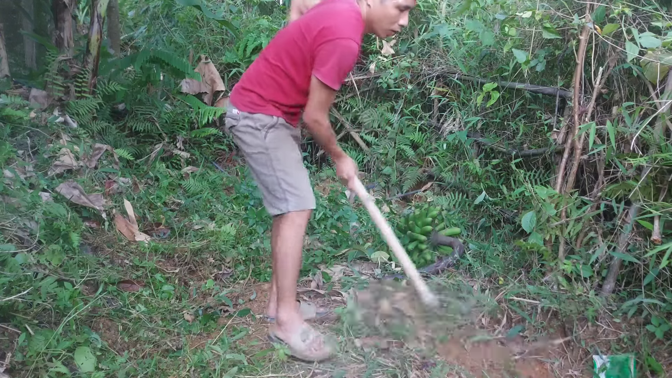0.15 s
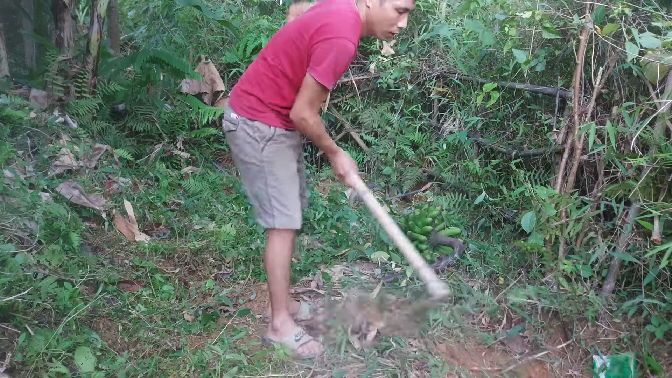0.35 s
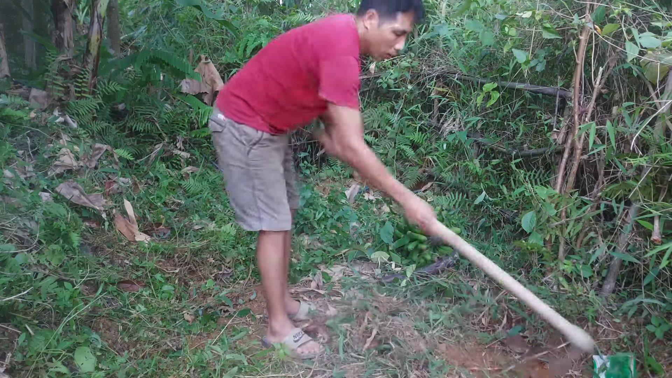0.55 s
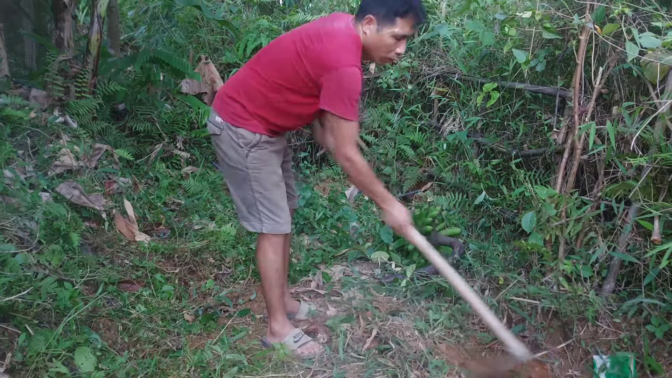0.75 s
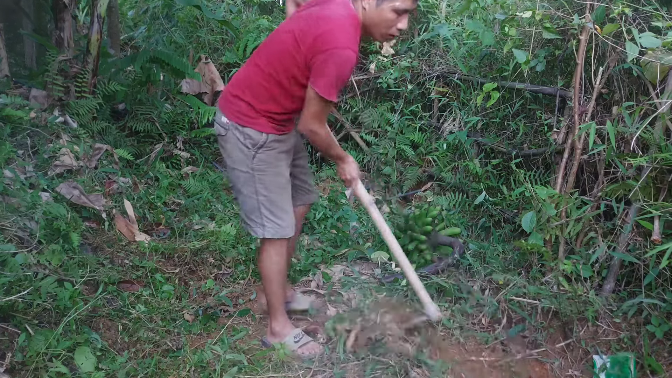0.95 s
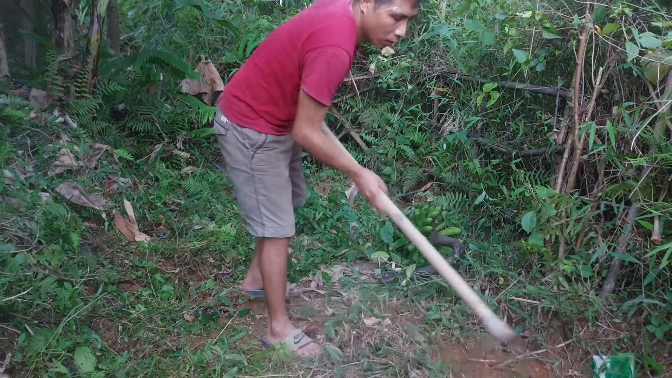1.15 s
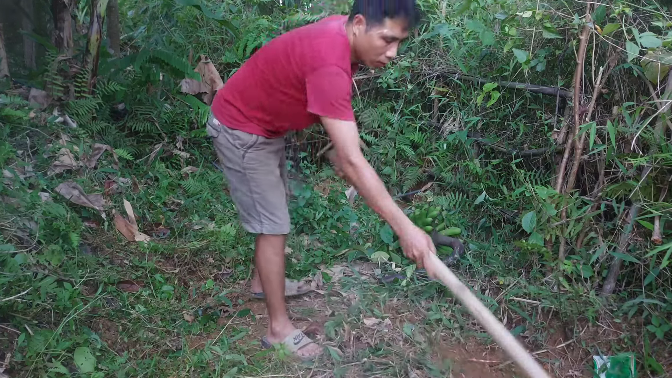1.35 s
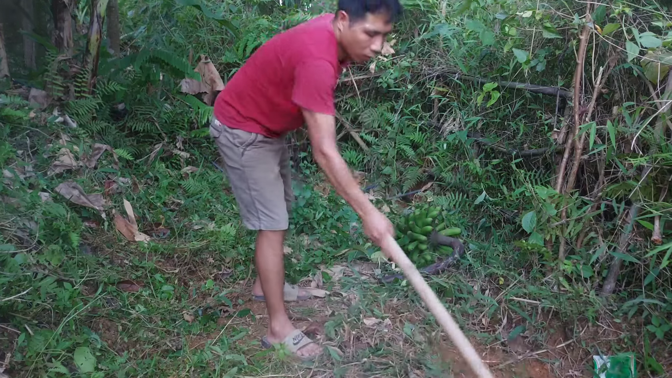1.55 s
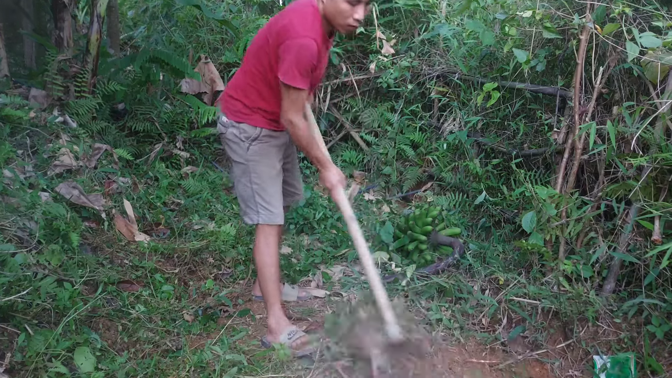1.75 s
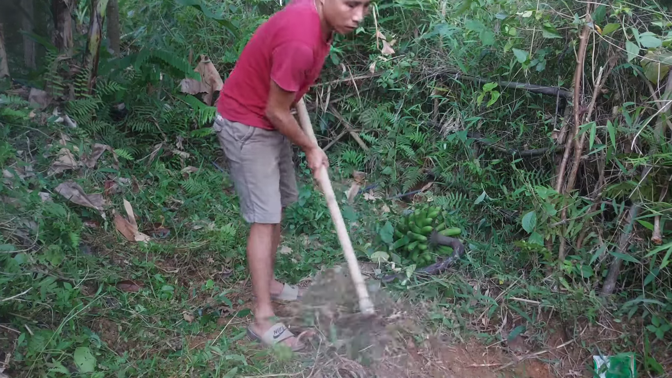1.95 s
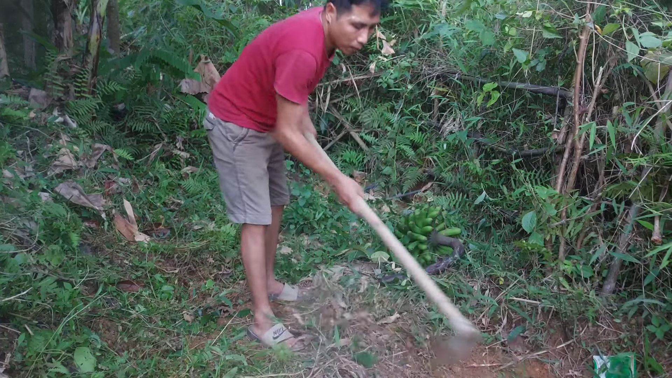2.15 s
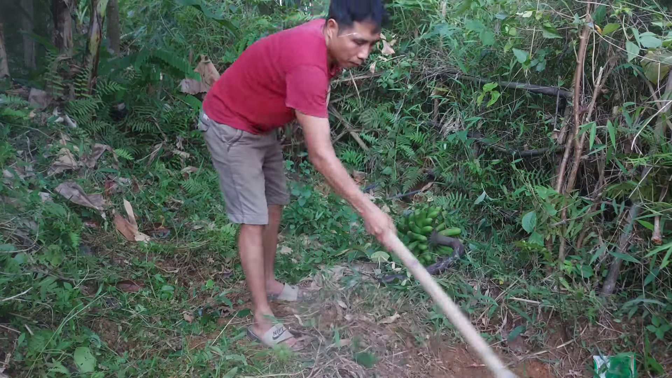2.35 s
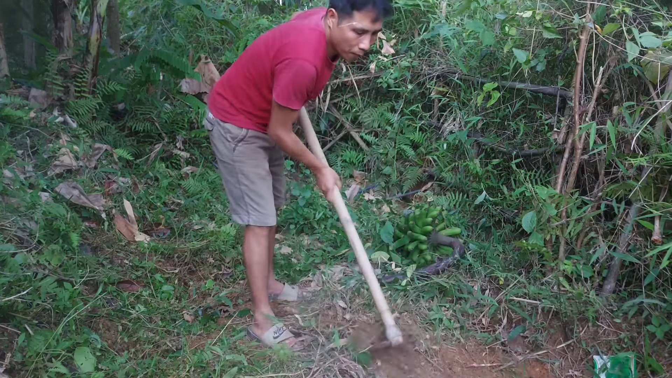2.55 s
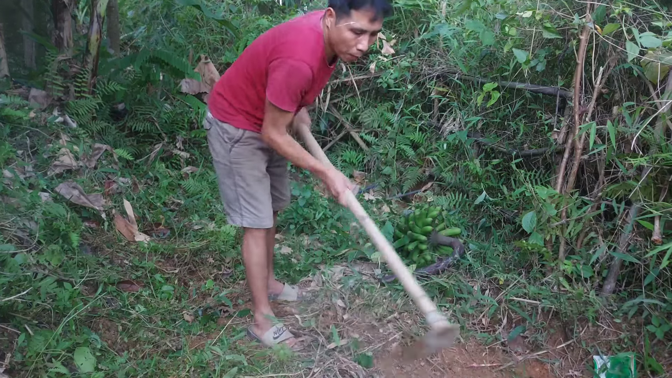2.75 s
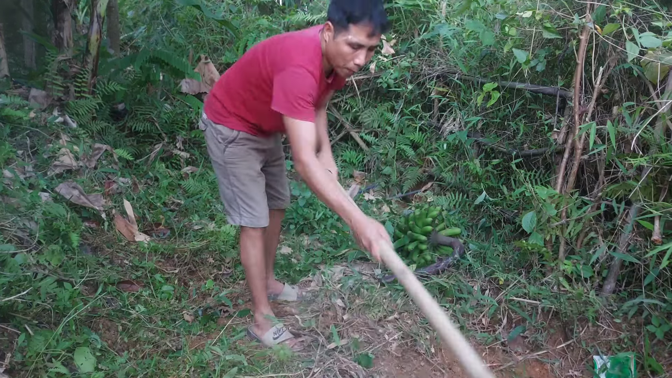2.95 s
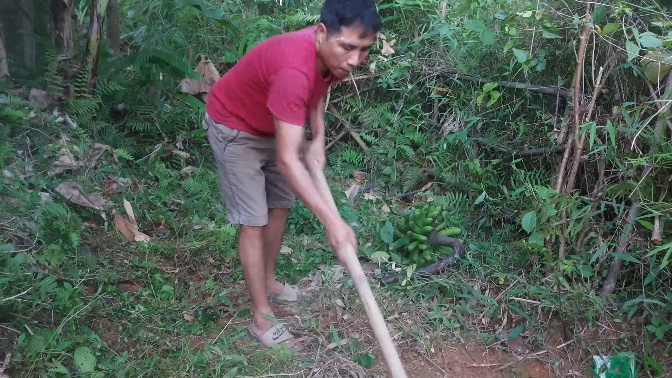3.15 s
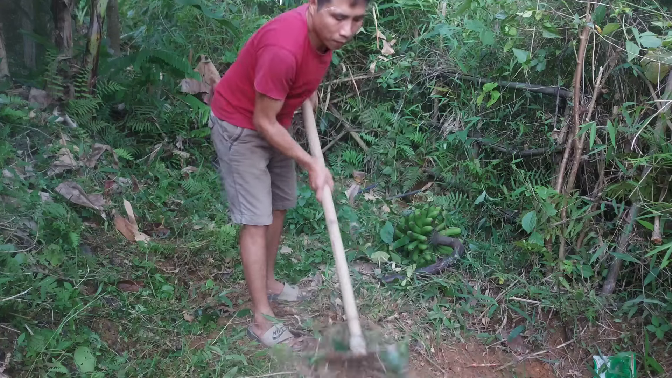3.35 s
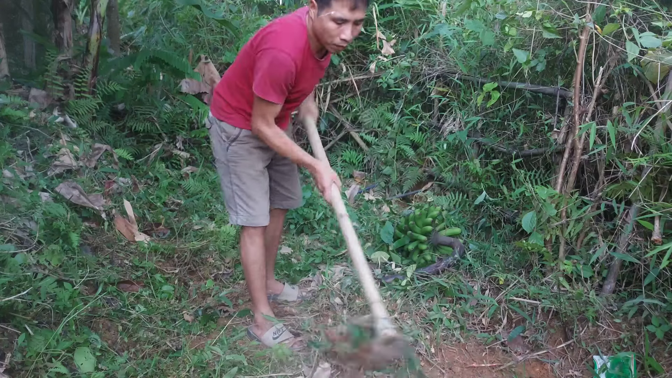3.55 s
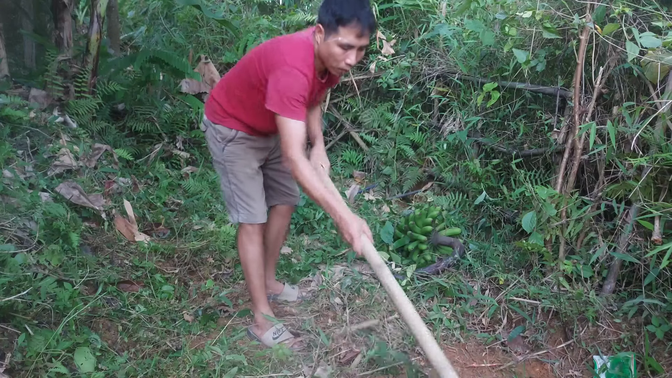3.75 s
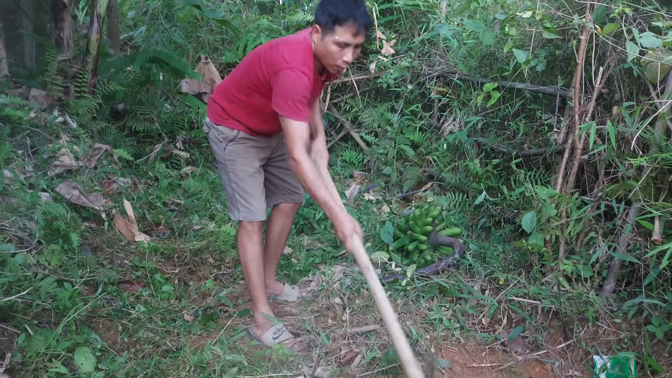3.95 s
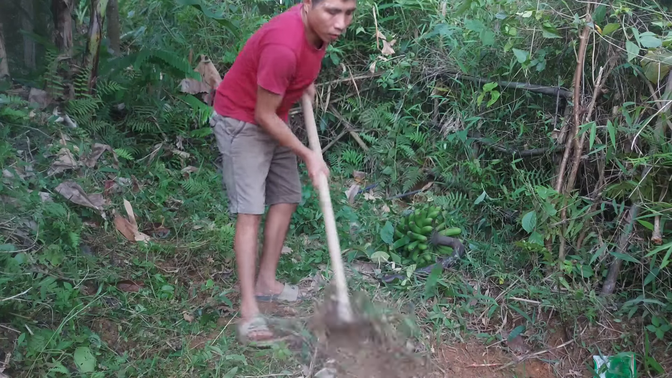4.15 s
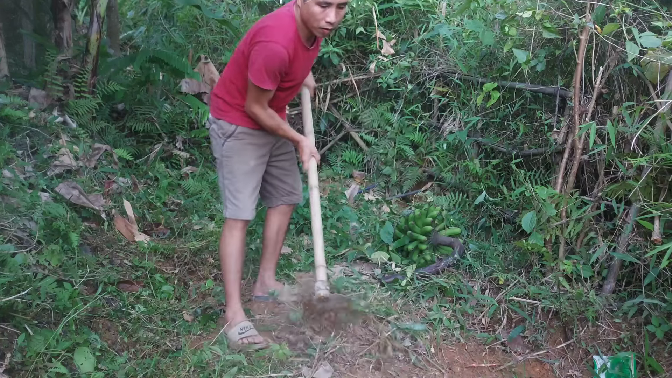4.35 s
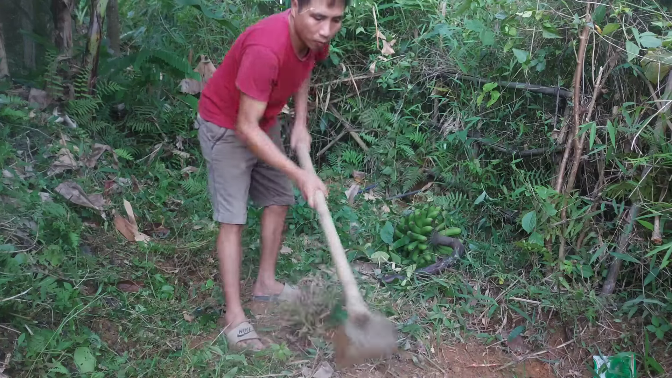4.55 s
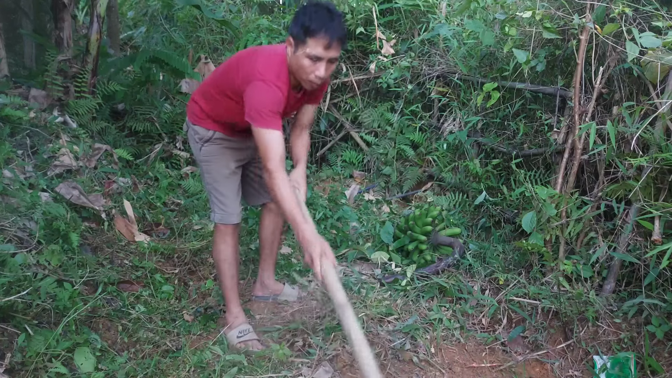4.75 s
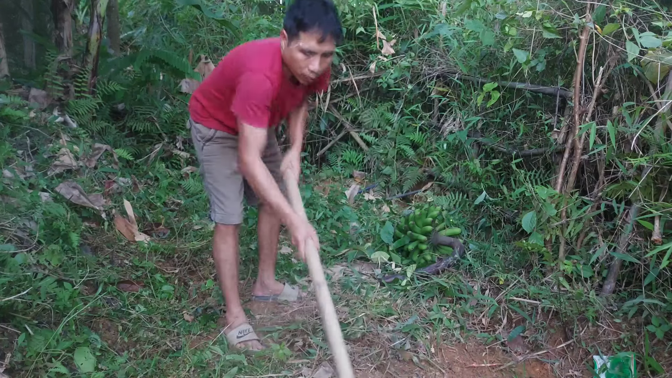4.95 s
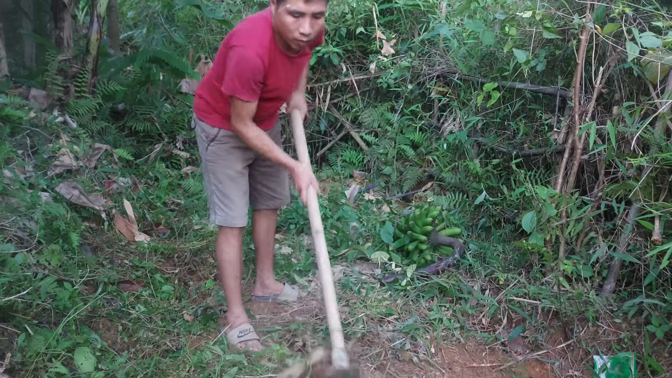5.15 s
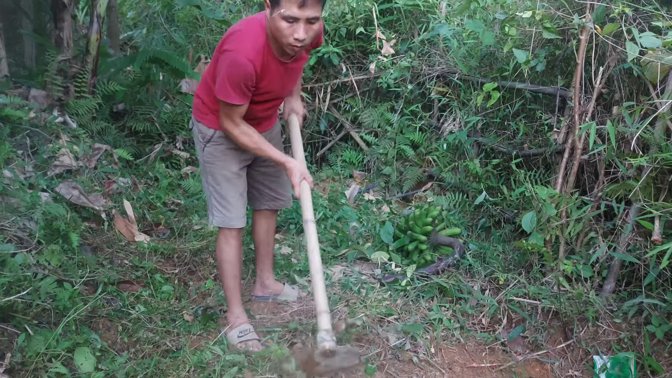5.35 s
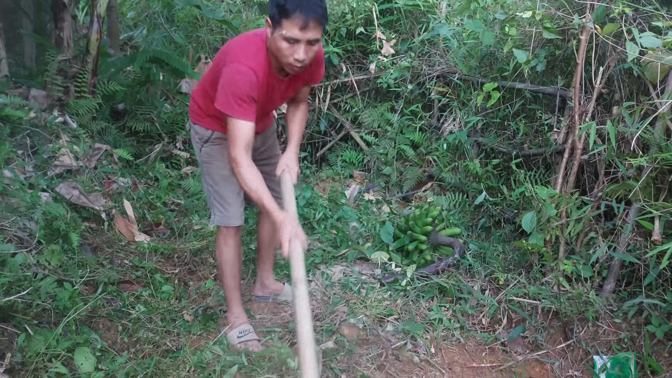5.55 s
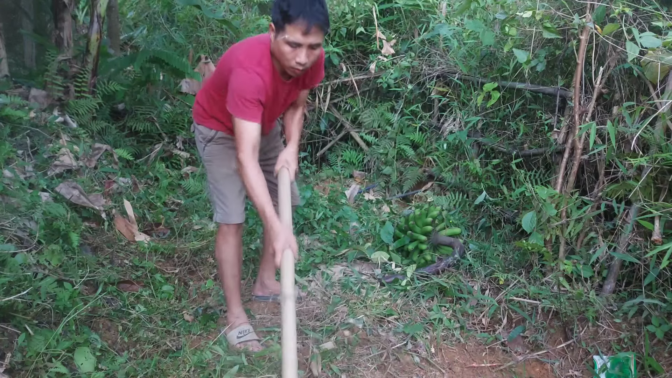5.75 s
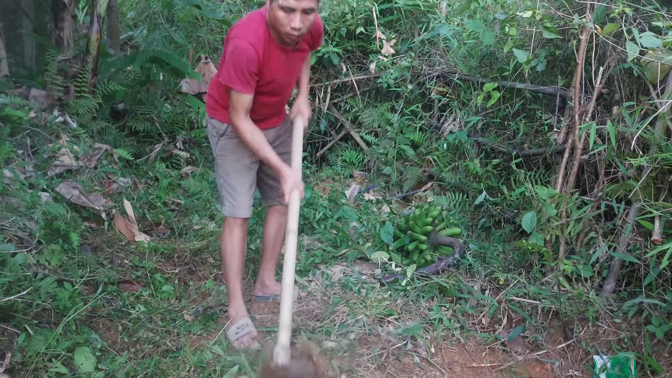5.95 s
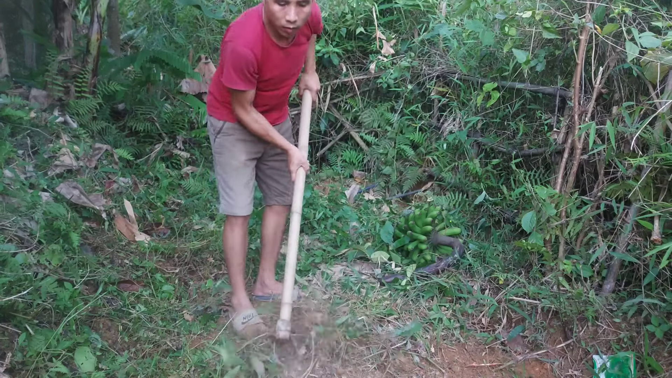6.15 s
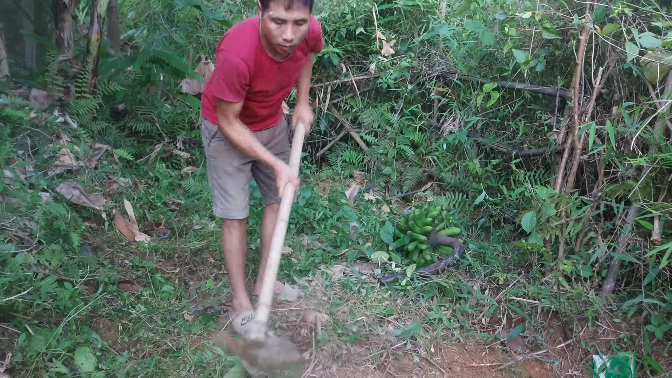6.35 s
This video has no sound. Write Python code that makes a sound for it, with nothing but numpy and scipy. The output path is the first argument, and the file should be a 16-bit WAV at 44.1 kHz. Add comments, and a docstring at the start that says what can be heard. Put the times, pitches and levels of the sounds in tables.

```python
"""First come a low distant rumble, a faint airy hiss and a fading scrape, and soon a small stem snaps.
Then a hoe chops into weedy soil in a garden and is dragged back after each stroke.
Shaped noise makes the background; showers of random clicks make the soil, leaves and grass.
Short bursts make the snaps, knocked resonances ring as handle and blade, and sagging tones make the thuds.
Two spaced microphones listen."""
import sys
import numpy as np
from scipy import signal
from scipy.io import wavfile
from scipy.ndimage import map_coordinates

SR = 44100
rng = np.random.default_rng(int(sys.argv[2]) if len(sys.argv) > 2 else 0)


def pcm_store(signal):
    """Save signal as 16-bit PCM."""
    levels = np.round(np.clip(np.atleast_2d(signal), -1, 1) * 32767)
    wavfile.write(sys.argv[1], SR, levels.astype(np.int16).T)


N = 286650


def from_db(db):
    """Turn decibels into a gain: every 20 dB is a factor of ten."""
    return 10 ** (np.asarray(db) / 20)


def rms_one(x):
    """Scale a signal so its average strength (rms) is 1."""
    return x / np.sqrt(np.mean(x ** 2) + 1e-20)


def in_time(rows):
    """Draw straight lines between timed points, giving each column one value per sample."""
    start_s, *columns = np.transpose(rows)
    return [np.interp(np.arange(N) / SR, start_s, column) for column in columns]


def at_hz(points, hz):
    """Read a curve at one frequency, with pitch spaced as the ear hears it (logarithmically)."""
    points_hz, values = np.array(points).T
    return np.interp(np.log(hz), np.log(points_hz), values)


def drift(rate_hz):
    """Smoothed noise that wanders with rms 1; a higher rate wanders faster."""
    pole = np.exp(-2 * np.pi * rate_hz * 20 / SR)   # one step every 20 samples
    chance = rng.standard_normal(N // 20 + 2002)
    slow = signal.lfilter([1], [1, -2 * pole, pole * pole], chance)[2000:]   # skip the filter's start
    return np.interp(np.arange(N) / 20, np.arange(len(slow)), rms_one(slow))


def add(out, start_s, sound):
    """Mix a sound in at a time, cutting off whatever runs past the end."""
    i = round(start_s * SR)
    out[..., i:i + sound.shape[-1]] += sound[..., :N - i]


def ring(force, modes):
    """A force sets each resonance swinging; a single click gives a fading sine."""
    out = 0
    for pitch_hz, level_db, t60_s in modes:
        pole = from_db(-60 / (max(t60_s, .002) * SR))
        turn = 2 * np.pi * pitch_hz / SR
        resonator = [1, -2 * pole * np.cos(turn), pole * pole]
        out = out + from_db(level_db) * signal.lfilter([0, np.sin(turn)], resonator, force + 1e-18)
    return out


def grit(per_s, uneven_db, shape):
    """Many tiny random impacts of uneven size and sign, scaled to rms 1."""
    sizes_db = uneven_db * np.minimum(rng.exponential(1, shape), 3.5)
    sizes = from_db(sizes_db) * rng.standard_normal(shape)
    return rms_one(sizes * (rng.random(shape) < per_s / SR))


# How alike the two channels are in each region: (pitch_hz, likeness [0 to 1])
CHANNEL_LIKENESS = [(60, 0.98), (150, 0.93), (380, 0.74), (950, 0.49), (2380, 0.31), (5980, 0.0043),
                    (15000, 0.12)]
# How much louder the left channel is than the right: (pitch_hz, left_over_right_db)
LEFT_BALANCE = [(60, 0), (150, 3.5), (380, 1), (950, 3), (2380, 1), (5980, -2.5), (15000, 5)]


def banded(white, spectrum, patchy_db, rate_hz):
    """Split noise into half-octave stereo bands with their own level, flicker and width; rms 1 overall."""
    out, together = 0, drift(rate_hz)   # this flicker is shared by all bands
    edges = 22 * 2 ** np.arange(0, 10, .5)
    for k, (low, high) in enumerate(zip(edges, edges[1:])):
        hz = np.sqrt(low * high)
        if not spectrum[0][0] < hz < 1.05 * spectrum[-1][0]:
            continue
        band = signal.butter(2, [low, high], "band", fs=SR, output="sos")
        mid, side = signal.sosfilt(band, white[k % 2])   # neighbouring bands use separate noise
        alike = np.clip(at_hz(CHANNEL_LIKENESS, hz), -1, 1)
        gain = from_db(at_hz(spectrum, hz) + patchy_db * (together + drift(rate_hz)))
        pair = np.sqrt(1 + alike) * mid + np.sqrt(1 - alike) * side * [[1], [-1]]
        balance = from_db(at_hz(LEFT_BALANCE, hz) * np.array([[.5], [-.5]]))
        out = out + gain * pair * balance
    return rms_one(out)


# Tone of the low distant rumble: (pitch_hz, relative level_db)
RUMBLE_TONE = [(15, -43), (25, -30.5), (59, 3.5), (86, 8.5), (111, 2), (183, -16.5), (220, -30), (290, -58),
               (480, -120)]
RUMBLE_DB = -56.5


def rumble():
    """A low distant rumble: noise shaped toward the bass, with a wandering level."""
    white = rng.standard_normal((2, 2, N))
    return from_db(RUMBLE_DB) * banded(white, RUMBLE_TONE, patchy_db=1.5, rate_hz=15.0)


# Tone of the faint airy hiss: (pitch_hz, relative level_db)
AIR_TONE = [(120, -33.5), (200, -5.5), (311, 0), (1160, -8.5), (4120, -11), (6520, -16), (10700, -12),
            (15100, -20.5), (16000, -23)]
AIR_DB = -62.5


def air():
    """A faint airy hiss: broad noise with an almost steady level."""
    white = rng.standard_normal((2, 2, N))
    return from_db(AIR_DB) * banded(white, AIR_TONE, patchy_db=.3, rate_hz=8.0)


# The blade is pulled back after each chop, one list of points per stroke:
# (start_s, soil level_db, grass level_db)
PULL_STROKES = [
    [(0, -46.5, -53), (.13, -49.5, -47), (.22, -54.5, -52), (.44, -53.5, -58.5), (.5, -61, -69.5),
     (.69, -64.5, -78)],
    [(.7, -63, -67), (.72, -50.5, -45.5), (.77, -50.5, -57.5), (.85, -49, -47), (.93, -58, -53),
     (1.1, -62.5, -67.5), (1.3, -69.5, -69.5), (1.43, -68, -76)],
    [(1.44, -60, -47), (1.47, -46.5, -63), (1.53, -52, -57), (1.6, -43.5, -50), (1.7, -45.5, -41.5),
     (1.8, -46.5, -44.5), (1.9, -51, -57), (2.04, -53.5, -59), (2.11, -60, -65), (2.36, -68, -85)],
    [(2.375, -58, -65), (2.4, -43.5, -65), (2.44, -53, -54), (2.52, -50.5, -49.5), (2.62, -67.5, -61.5),
     (2.75, -67.5, -74), (3.07, -91, -86)],
    [(3.085, -58, -64), (3.12, -45.5, -45.5), (3.2, -45, -43.5), (3.3, -50, -43.5), (3.42, -60.5, -60),
     (3.6, -65, -65.5), (3.88, -74, -75)],
    [(3.893, -53, -63), (3.92, -35.5, -45), (3.97, -55, -55), (4.05, -43.5, -44.5), (4.15, -56.5, -52.5),
     (4.21, -54.5, -58), (4.3, -56.5, -59), (4.4, -64.5, -69), (4.62, -72, -66), (4.78, -62.5, -65)],
    [(4.79, -63, -48), (4.81, -43.5, -49), (4.9, -51, -53), (4.96, -42.5, -46), (5.06, -49, -49.5),
     (5.19, -50, -50), (5.26, -60.5, -56), (5.33, -57, -59.5), (5.5, -78.5, -70.5), (5.67, -66, -76)],
    [(5.688, -62, -52), (5.71, -50, -40), (5.76, -46.5, -43.5), (5.87, -45.5, -42.5), (5.93, -46.5, -47),
     (6.0, -47, -44.5), (6.12, -50.5, -51), (6.25, -58.5, -65), (6.31, -57.5, -58.5), (6.4, -66, -67),
     (6.5, -71.5, -69)],
]


def pulled():
    """Soil and grass levels in dB as the blade is pulled back, all strokes in a row."""
    return in_time([row for stroke in PULL_STROKES for row in stroke])


def swell(rise_s, t60_s):
    """A quick rise, then a fall of 60 dB over t60_s."""
    t, rise_s = np.arange(SR // 2) / SR, max(rise_s, .0005)
    fall_db = -60 * np.maximum(t - rise_s, 0) / max(t60_s, .01)
    return np.minimum(t / rise_s, 1) ** 2 * from_db(fall_db)


CLOD_DB = -7.5   # slow clods against soil
LEAF_DB, LEAF_SHARE = -0.5, 0.59   # leaves follow grass by this share, soil by the rest
BITE_CLOD_DB, BITE_LEAF_DB = -19.5, -7.5   # in a bite: clods against soil, leaves against grass
CRUMBLE_RISE_S = 0.013
# The edge bites through turf: (start_s, soil level_db, grass level_db, rise_s, t60_s)
TURF_BITES = [(.711, -60, -49, 0.0098, 0.049), (0.785, -35.5, -42, 0.00083, .21),
              (1.445, -52, -35.5, 0.0044, 0.088), (1.543, -35, -30.5, 0.0014, 0.11),
              (1.699, -42, -49, 0.011, 0.22), (2.381, -43.5, -46.5, 0.0042, .06),
              (2.529, -57, -50, 0.0045, 0.11), (3.098, -50, -48, 0.012, .17),
              (3.125, -42, -54, 0.0072, .12), (3.199, -47, -45.5, 0.011, 0.18),
              (3.902, -40, -41.5, 0.019, 0.11), (4.053, -36.5, -40, .0037, 0.029),
              (4.796, -36, -36.5, 0.0014, 0.051), (4.851, -30, -33, 0.0011, 0.14),
              (5.01, -53, -43, .01, 0.14), (5.692, -31, -53.5, 0.01, .085),
              (5.717, -37, -35, 0.0033, 0.032), (5.82, -35, -39, 0.012, .043),
              (5.835, -21.5, -30, .002, 0.084)]
# Clods crumbling apart: (start_s, level_db, t60_s)
CLOD_CRUMBLES = [(.715, -47.5, 0.28), (.8, -43, 0.13), (1.57, -45, 0.18), (2.45, -47, 0.54),
                 (3.13, -55, 0.2), (3.22, -51, 0.26), (3.911, -47, 0.091), (4.07, -60, 0.36),
                 (5.0, -53.5, 0.96), (5.74, -42, 0.31)]


def pressure():
    """Clod, grit, leaf and grass gains: the slow pull plus quick bites and crumbling clods."""
    soil, grass = pulled()
    leaf = LEAF_DB + LEAF_SHARE * grass + (1 - LEAF_SHARE) * soil
    gains = from_db([soil + CLOD_DB, soil, leaf, grass])
    for start_s, soil_db, grass_db, rise_s, t60_s in TURF_BITES:
        levels_db = [[soil_db + BITE_CLOD_DB], [soil_db], [grass_db + BITE_LEAF_DB], [grass_db]]
        add(gains, start_s, from_db(levels_db) * swell(rise_s, t60_s))
    for start_s, level_db, t60_s in CLOD_CRUMBLES:
        add(gains[0], start_s, from_db(level_db) * swell(CRUMBLE_RISE_S, t60_s))
    return gains


# Tone of breaking clods: (pitch_hz, relative level_db per Hz)
CLOD_TONE = [(120, -29), (200, -4), (320, 0), (500, -1.5), (800, -3.5), (1400, -35)]


def breaking_clods():
    """Clods break in fairly sparse, very uneven impacts with a low tone."""
    impacts = grit(800, 3.2, (2, 2, N))
    return banded(impacts, CLOD_TONE, patchy_db=3.0, rate_hz=16.0)


# Tone of soil grinding under the edge: (pitch_hz, relative level_db per Hz)
SOIL_TONE = [(400, -14), (700, -2.5), (1000, -2), (1600, 0), (2400, -2), (3500, -5.5), (5500, -15.5),
             (9000, -27)]
# Ringing tones of the handle: (pitch_hz, relative level_db, t60_s)
HANDLE_MODES = [(600, -4, 0.04), (689, 0.5, 0.066), (786, 0, 0.069), (813, -2.5, 0.1), (863, 0, .06),
                (1039.5, -3, 0.046)]
# Ringing tones of the blade: (pitch_hz, relative level_db, t60_s)
BLADE_MODES = [(1413, 7.5, 0.053), (1680, -8, 0.022), (1910, 3, 0.016), (2170, -9.5, 0.12), (2640, 1, 0.03),
               (2920, 5.5, 0.035), (4030, 6.5, 0.017), (5920, 3, 0.025), (6060, -18.5, .015),
               (7400, -25.5, .015)]


def grinding_soil():
    """Crumbs grind under the edge, and the same impacts shake the handle and blade."""
    crumbs = grit(2500, 2.0, (2, 2, N))
    soil = banded(crumbs, SOIL_TONE, patchy_db=1.52, rate_hz=24.0)
    shake = rms_one(ring(crumbs[0, 0], HANDLE_MODES + BLADE_MODES))
    return soil + from_db(-9.5) * shake


# Tone of tearing leaves: (pitch_hz, relative level_db per Hz)
LEAF_TONE = [(1500, -31), (2600, -2), (4000, -8.5), (5500, -9), (7000, -8.5), (9000, -10), (13000, -11)]
# Tone of tearing grass: (pitch_hz, relative level_db per Hz)
GRASS_TONE = [(4000, -11), (6500, -12.5), (9000, -6.5), (11500, 2.5), (13000, -4.5), (14500, -9),
              (16000, -11)]


def tearing_plants():
    """Leaves and grass tear in the same fine, dense grains, each with its own tone."""
    grains = grit(9000, 1.1, (2, 2, N))
    leaves = banded(grains, LEAF_TONE, patchy_db=1.56, rate_hz=29.5)
    grass = banded(grains, GRASS_TONE, patchy_db=0.83, rate_hz=18.0)
    return leaves, grass


def drag():
    """The moving hoe presses on clods, soil, leaves and grass; the pressure sets how loud each is."""
    clod_gain, grit_gain, leaf_gain, grass_gain = pressure()
    leaves, grass = tearing_plants()
    ground = clod_gain * breaking_clods() + grit_gain * grinding_soil()
    return ground + leaf_gain * leaves + grass_gain * grass


TWIGS_PER_S, TWIG_DB = 7.8, 18.5   # small stems snap at random, this far above the pull's grass level
# Stems snapping: (start_s, peak level_db, pitch_hz)
STEM_SNAPS = [(0.07, -22, 9500), (0.322, -44, 2500), (.4624, -54, 2100), (1.4752, -15, 11300),
              (1.619, -37, 2760), (1.6315, -18, 11100), (1.657, -22, 9110), (1.753, -25, 4940),
              (1.834, -27.5, 2190), (1.9623, -41, 2720), (2.0364, -34.5, 2560), (2.047, -36, 2530),
              (2.411, -26, 13500), (2.271, -55, 2300), (3.02, -44, 2300), (3.085, -43, 3430),
              (3.128, -19, 4350), (3.159, -21, 3970), (3.169, -24, 8920), (3.903, -22.5, 7960),
              (3.9675, -31, 11900), (4.014, -29, 11400), (4.084, -22, 12100), (4.6149, -37.5, 10000),
              (4.961, -17.5, 3860), (5.703, -16, 6500), (5.859, -10, 10800), (5.8764, -15, 10600),
              (6.046, -25, 10500), (6.157, -27, 12500)]


def snaps():
    """A stem breaks: a noise burst of about a millisecond around its pitch."""
    out, t = np.zeros(N), np.arange(SR // 50) / SR
    grass_db = pulled()[1]
    twigs = []
    for when, high in rng.random((int(TWIGS_PER_S * N / SR), 2)):
        twigs.append((when * N / SR, grass_db[int(when * N)] + TWIG_DB, 2000 * 6 ** high))
    for start_s, peak_db, pitch_hz in STEM_SNAPS + twigs:
        band = signal.butter(1, [.75 * pitch_hz, 1.3 * pitch_hz], "band", fs=SR, output="sos")
        burst = signal.sosfilt(band, rng.standard_normal(len(t)) * np.exp(-t / 0.00079))
        add(out, start_s, from_db(peak_db) * burst / np.max(np.abs(burst)))
    return out


REGION_OCTAVES = .2   # how wide a set of modes one knock wakes


def woken(modes, region_hz):
    """Where the hoe is hit picks the modes that sound: those far from the region are turned down."""
    picked = []
    for pitch_hz, level_db, t60_s in modes:
        away = np.log2(pitch_hz / region_hz) / REGION_OCTAVES
        picked.append((pitch_hz, level_db - min(6 * away ** 2, 19), t60_s))
    return picked


SINK_S, SINK_DB = .009, -3.5   # soil grips the sinking blade this long after contact, taking this much ring
GRIND_SHARE, CRACK_S = 0.19, 0.0011   # grind against contact; time for the crack to fall to 37 %
KNOCK_CUT_HZ = 226   # knocks are kept above this pitch, without deep bass
# Low ringing tones of the handle: (pitch_hz, relative level_db, t60_s)
LOW_HANDLE_MODES = [(276.4, -14, 0.021), (409, -13, 0.096)]
# Knocks on roots and stones: (start_s, handle level_db, handle region_hz, low handle level_db,
# blade level_db, blade region_hz, grind_s [time to fall to 37 %], crack level_db)
HOE_KNOCKS = [(.731, -41, 730, -48, -48, 1550, 0.0039, -52),
              (.789, -42, 820, -41.5, -33, 2400, 0.0026, -24.5),
              (1.453, -52, 880, -65, -31, 2190, .0025, -59),
              (1.545, -48, 720, -49, -35, 1420, 0.0036, -32.5),
              (1.586, -55, 630, -46, -42, 1400, 0.0027, -39),
              (2.025, -58, 850, -71, -44, 1760, 0.0011, -62), (2.269, -72, 730, -80, -56, 1650, .0018, -74),
              (2.367, -62, 740, -64, -48, 1400, 0.0029, -70), (2.389, -55, 820, -60, -37, 2570, 0.003, -52),
              (2.391, -53, 820, -66, -30, 1400, 0.0015, -59),
              (2.412, -45.5, 810, -43.5, -44, 1400, 0.0037, -60),
              (2.539, -53, 626, -66, -44, 2040, 0.0011, -45.5),
              (3.114, -42, 800, -49, -41, 1400, .0028, -34.5),
              (3.133, -31.5, 780, -44, -54, 2400, 0.0025, -41),
              (3.157, -32.5, 870, -44, -38.5, 2820, .003, -36),
              (3.209, -40, 780, -45, -37.5, 1440, 0.0029, -55),
              (3.908, -49, 760, -61, -37, 1400, .003, -36),
              (3.918, -27.5, 770, -32.5, -29, 1400, 0.0068, -32),
              (4.055, -36.5, 744, -42, -41.5, 1400, 0.0049, -46),
              (4.798, -25.5, 1093, -29, -27, 2080, 0.0059, -31),
              (4.847, -11, 894, -20, -9, 1900, 0.0019, -16.5),
              (5.018, -36, 780, -43, -42, 1410, 0.0053, -38.5),
              (5.7101, -25, 810, -63, -26, 1440, 0.0085, -34),
              (5.724, -44, 784, -65, -24.5, 1740, 0.0024, -29),
              (5.7737, -24.5, 790, -28, -53, 1400, 0.0026, -31.5),
              (5.837, -10.5, 950, -21, -23.5, 2040, 0.0042, -25.5),
              (5.8423, -23, 880, -24.5, -27, 1390, 0.0022, -58)]


def knocks():
    """A sharp contact and a short grind set handle and blade ringing; the contact itself cracks."""
    out, t = np.zeros(N), np.arange(SR // 6) / SR
    crack_band = signal.butter(2, [3000, 10000], "band", fs=SR, output="sos")
    gripped = from_db(SINK_DB * np.clip((t - SINK_S) / 0.0017, 0, 1))
    for start_s, handle_db, handle_hz, low_db, blade_db, blade_hz, grind_s, crack_db in HOE_KNOCKS:
        grind_noise, crack_noise = rng.standard_normal((2, len(t)))
        force = GRIND_SHARE * grind_noise * np.exp(-t / max(grind_s, .0003))
        force[0] = 1   # the sharp contact
        handle = ring(force, woken(HANDLE_MODES, handle_hz))
        low_handle = ring(force, LOW_HANDLE_MODES)
        blade = ring(force, woken(BLADE_MODES, blade_hz))
        crack = signal.sosfilt(crack_band, crack_noise * np.exp(-t / CRACK_S))
        knock = np.zeros(len(t))
        for level_db, part in zip([handle_db, low_db, blade_db, crack_db], [handle, low_handle, blade, crack]):
            knock += from_db(level_db) * part / np.std(part[:SR // 200])   # levelled over the first 5 ms
        add(out, start_s, gripped * knock)
    return signal.sosfilt(signal.butter(3, KNOCK_CUT_HZ, "high", fs=SR, output="sos"), out)


# Low thuds with the hard blows and one near the end:
# (start_s, level_db, first pitch_hz, last pitch_hz, t60_s)
LOW_THUDS = [(4.849, -20, 264, 236, 0.043), (5.836, -16, 272, 233, 0.078), (6.160, -32, 141, 61, 0.14)]


def thuds():
    """Each low thud is a damped tone that sags in pitch."""
    out, t = np.zeros(N), np.arange(SR // 3) / SR
    for start_s, level_db, first_hz, last_hz, t60_s in LOW_THUDS:
        pitch_hz = last_hz + (first_hz - last_hz) * np.exp(-t / 0.0286)
        tone = np.sin(2 * np.pi * np.cumsum(pitch_hz) / SR)
        onset = 1 - np.exp(-t / .003)
        add(out, start_s, from_db(level_db - 60 * t / t60_s) * onset * tone)
    return out


SCATTER_DB, SCATTER_T60_S = -6, .05   # echoes from ground and bushes
SCATTER_FROM_HZ = 1900   # only the treble is scattered, so low ringing stays clear
# The digger works across the pair of microphones: (start_s, left lag [microseconds])
LEFT_LAGS = [(0, 54), (3, 10.5), (6.5, -81.5)]


def placed(x):
    """A point source reaches the two microphones with a lag, then scatters differently to each."""
    lag_us, = in_time(LEFT_LAGS)
    heard_at = np.clip(np.arange(N) - lag_us * 1e-6 * SR, 0, N - 1)
    left = map_coordinates(x, [heard_at], order=3)
    t = np.arange(SR // 5) / SR
    scatter = rng.standard_normal((2, len(t))) * from_db(-60 * t / SCATTER_T60_S) * (t > .0004)
    scatter = signal.sosfilt(signal.butter(1, SCATTER_FROM_HZ, "high", fs=SR, output="sos"), scatter)
    scatter = scatter / np.sqrt(np.sum(scatter ** 2, axis=1, keepdims=True))
    echoes = signal.fftconvolve(x[None], scatter, axes=1)[:, :N]
    direct = np.array([left * from_db(-1.23), x * from_db(-2.16)])
    return direct + from_db(SCATTER_DB) * echoes


def scene():
    """Background, dragging hoe, and the placed snaps, knocks and thuds together."""
    background = rumble() + air()
    return background + drag() + placed(snaps() + knocks() + thuds())


ROUNDING_LEVEL = .8   # level near which the hardest peaks are rounded off
CUTOFF_HZ = 16150


def record(dry):
    """The hardest peaks are rounded and the top is cut steeply."""
    rounded = dry / (1 + np.abs(dry / ROUNDING_LEVEL) ** 4) ** .25
    return signal.sosfilt(signal.cheby2(18, 60, CUTOFF_HZ, fs=SR, output="sos"), rounded)


dry = scene()
out = record(dry)
pcm_store(out)
```